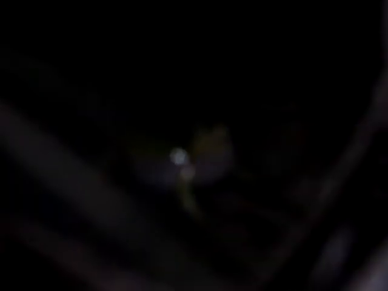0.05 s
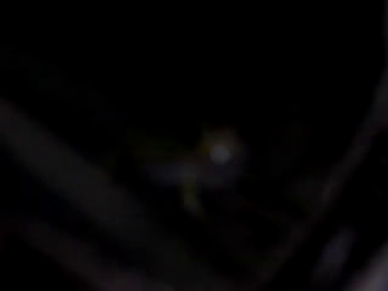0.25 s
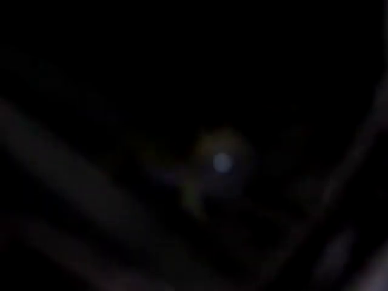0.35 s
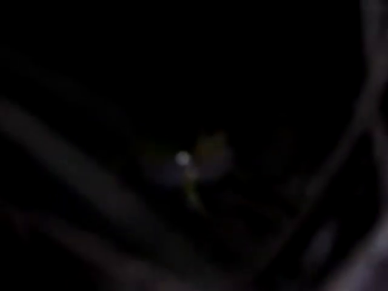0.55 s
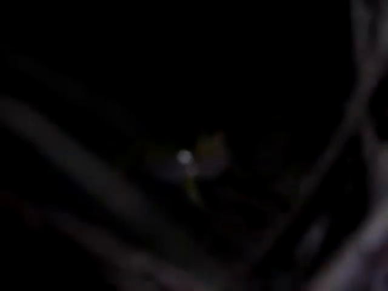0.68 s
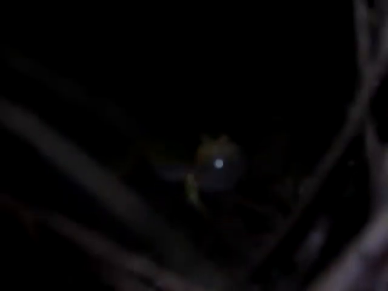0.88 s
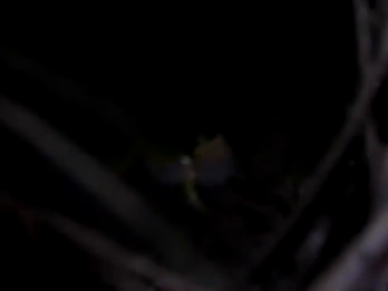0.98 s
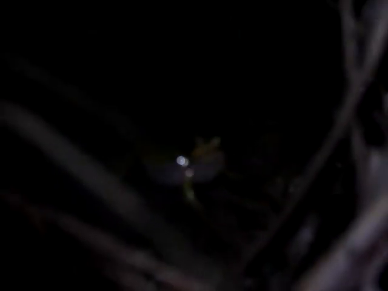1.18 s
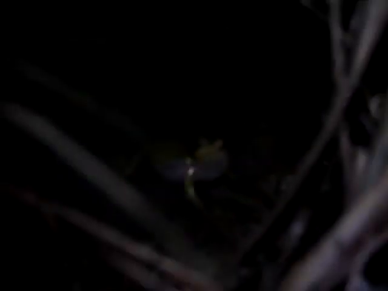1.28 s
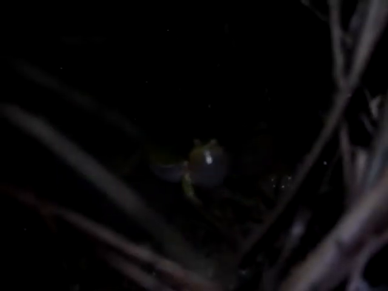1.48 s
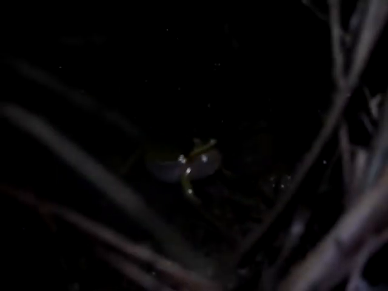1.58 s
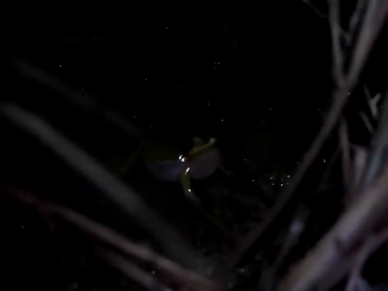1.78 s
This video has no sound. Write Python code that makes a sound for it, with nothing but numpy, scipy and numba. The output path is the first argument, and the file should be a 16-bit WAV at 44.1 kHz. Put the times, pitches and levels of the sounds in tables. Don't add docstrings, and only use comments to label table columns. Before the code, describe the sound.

A small tree frog croaks close by at 0.22, 0.77 and 1.29 seconds, each a harsh, nasal rattle of about nineteen rapid double pulses lasting 0.16 seconds, brightening as it swells; a fourth just begins at 1.84. Underneath, steady high crickets and rasping katydids, low hiss, faint far frogs between croaks, and soft camera knocks, notably near 1.15. The background dips during croaks. Outdoors, night, little echo.

```python
import sys
import numpy as np
from scipy import signal
from scipy.io import wavfile
from scipy.ndimage import uniform_filter1d
from numba import njit

SR = 44100
rng = np.random.default_rng(int(sys.argv[2]) if len(sys.argv) > 2 else 0)


def invert_db(level):
    return 10 ** (np.asarray(level, dtype=float) / 20)


def inscribe(sig):
    pcm = np.round(np.clip(np.atleast_2d(sig).T, -1, 1) * 32767)
    wavfile.write(sys.argv[1], SR, pcm.astype(np.int16))


N = 81585
TIME = np.arange(N) / SR


@njit
def moving_bandpass(x, hz, width):
    y, band_state, low_state = np.empty(len(x)), 0., 0.
    for i in range(len(x)):
        g, damping = np.tan(np.pi * hz[i] / SR), width / hz[i]
        v = (band_state + g * (x[i] + 1e-18 - low_state)) / (1 + g * (g + damping))
        band_state = 2 * v - band_state
        low_state += 2 * g * v
        y[i] = damping * v
    return y


def resonate(x, hz, width, widening=1):
    hz = hz + np.zeros(N)
    return moving_bandpass(moving_bandpass(x, hz, float(width)), hz, float(widening * width))


def set_level(x, db):
    return x * invert_db(db) / np.sqrt(np.mean(x ** 2))


def walk(rate):
    hold = int(SR / rate)
    steps = np.repeat(rng.standard_normal(N // hold + 1), hold)[:N]
    return 0.93 * uniform_filter1d(uniform_filter1d(steps, hold), hold)


def clicks(times, sizes):
    at = np.asarray(times)[:, None] * SR
    idx = np.floor(at).astype(int) + np.arange(-8, 9)
    shape = np.sinc(idx - at) * np.cos(np.pi * (idx - at) / 18) ** 2
    out = np.zeros(N + SR)
    np.add.at(out, idx, np.asarray(sizes)[:, None] * shape)
    return out[:N]


def window(centre, length, edge):
    return np.clip((length / 2 - np.abs(TIME - centre)) / edge + .5, 0, 1)


# f/Hz, level/dB (per Hz)
NIGHT_COLOUR = [(30, 10), (60, -15), (150, -15.5), (500, -13), (2000, -13), (3500, -12), (4400, -18),
                (10000, -18.5)]


def night():
    out, rows = 0, np.array(NIGHT_COLOUR)
    for hz in 30 * 2 ** np.arange(0, 8.5, 1 / 3):
        db = np.interp(np.log(hz), np.log(rows[:, 0]), rows[:, 1]) + walk(5)
        out = out + invert_db(db) * resonate(rng.standard_normal(N), hz, hz / 3)
    return set_level(out, -55)


# f/Hz, width/Hz, trill rate/Hz, trill depth (0-1), flicker/dB, level/dB
INSECT_VOICES = [
    (3750, 260, 13, 0, -10.5, -49),
    (6394, 393, 50, 0.3, .8, -52.5),
    (3083, 360, 57, 0.5, 4, -52.5),
]


def insects():
    out = 0
    for hz, width, rate, depth, flicker_db, db in INSECT_VOICES:
        phase = np.cumsum(rate * (1 + 0.035 * walk(5.34))) / SR
        throb = 1 + depth * np.sin(2 * np.pi * phase)
        rasp = resonate(rng.standard_normal(N), hz, width, 1.77)
        flicker = invert_db(min(flicker_db, 1.2) * walk(30))
        out = out + set_level(rasp * throb * flicker, db)
    return out


CRICKET_HZ, CRICKET_FALL_HZ, CRICKET_PER_S, CRICKET_DB = 3804, 69, 39.6, -50.5


def cricket():
    beat = np.cumsum(CRICKET_PER_S * (1 + 0.011 * walk(4.4))) / SR % 1
    hz = CRICKET_HZ + CRICKET_FALL_HZ * (1 - 2 * beat) + 12 * walk(25)
    pulses = np.sin(np.pi * beat) ** 4.5 * invert_db(1.3 * walk(60))
    return set_level(pulses * np.sin(2 * np.pi * np.cumsum(hz) / SR), CRICKET_DB)


# t/s, level/dB
CAMERA_KNOCKS = [(.045, -84), (0.439, -72.5), (0.629, -77), (.19, -72.5), (1.148, -68), (1.18, -75.5),
                 (1.244, -78.5)]
# f/Hz, width/Hz, level/dB
CAMERA_BODY = [
    (356, 23, 1),
    (565, 114, 14),
    (880, 120, 14),
]


def knocks():
    rows = np.array(CAMERA_KNOCKS)
    hit = uniform_filter1d(clicks(rows[:, 0], invert_db(rows[:, 1])), 12)
    return sum(invert_db(db) * resonate(hit, hz, width) * SR / width for hz, width, db in CAMERA_BODY)


# centre t/s, length/s, pulse rate/Hz, level/dB
FAR_CALLS = [
    (0.174, 0.11, 120, -58),
    (0.689, 0.23, 118, -62.5),
    (1.051, 0.31, 122, -62),
    (1.47, 0.099, 120, -60),
    (1.678, 0.2, 85, -62),
]
# f/Hz, width/Hz, level/dB
FAR_RESONANCES = [
    (1420, 900, 6.2),
    (2390, 67, -5.5),
    (2653, 600, 8),
    (3270, 170, 6),
]


def far_frogs():
    gate = 0
    for centre, length, rate, db in FAR_CALLS:
        pulses = np.exp(-(TIME * rate % 1) / 1.05)
        gate = gate + invert_db(db) * window(centre, length, 0.091) * pulses
    calls = gate * rng.standard_normal(N)
    return sum(invert_db(db) * resonate(calls, hz, width) * np.sqrt(SR / width) for hz, width, db in FAR_RESONANCES)


FULL_PULSES = 19
PERIOD_MS, SPEEDUP_MS, PULSE_JITTER_MS = 8.4, .045, .13
START_DRAG_MS, START_DRAG_PULSES, END_DRAG_MS, END_DRAG_PULSES = 3.0, .9, .9, .8
RISE_DB, RISE_PULSES, FALL_DB, FALL_PULSES = -22, 1.2, -12, 1.5
SLAP_GAP_MS, EDGE_GAP_MS, SLAP_JITTER_MS, SLIP_MS = 2.6, .9, .03, .025
SECOND_DB, EDGE_SECOND_DB, SCATTER_DB, SIGH_MS = 1.5, 7, .5, 8.5
SNAP_LOSS, SNAP_FADE_DB = 5.0, -48
RASP_MS, RASP_DB, RASP_LOSS = 5.7, 10.5, 0.63
# t/s, level/dB (loss)
FEEBLE_SLAPS = [(.258, -11.5), (.266, -12), (.2745, -6), (.299, -13), (.3145, -4.5), (.322, -10.5),
                (.338, -11.5), (.354, -7), (.797, -8.5), (.830, -10), (.846, -17.5), (.862, -10),
                (.878, -8.5), (.886, -5), (.893, -3.5), (1.379, -11.5), (1.395, -7.5), (1.418, -14.5)]


def slaps(start, stretch, db, sigh_db, count):
    k = np.arange(count)
    left = max(count, FULL_PULSES) - 1 - k
    early, late = np.exp(-k / START_DRAG_PULSES), np.exp(-left / END_DRAG_PULSES)
    swell, fade = np.exp(-k / RISE_PULSES), np.exp(-left / FALL_PULSES)
    gap_chance, second_chance, first_chance, time_chance = rng.standard_normal((4, count))

    period_ms = PERIOD_MS - SPEEDUP_MS * k + START_DRAG_MS * early
    period_ms = period_ms + END_DRAG_MS * np.exp(-(left - 1) / END_DRAG_PULSES)
    onset = start + stretch * (np.cumsum(period_ms) - period_ms) / 1000
    onset = onset + PULSE_JITTER_MS * time_chance / 1000
    feeble = np.array(FEEBLE_SLAPS)
    loss_db = (np.abs(onset[:, None] - feeble[:, 0]) < .004) @ feeble[:, 1]

    size_db = db + RISE_DB * swell + FALL_DB * fade
    gap_ms = SLAP_GAP_MS + EDGE_GAP_MS * (early + late) + SLAP_JITTER_MS * gap_chance + SLIP_MS * loss_db
    second_s = onset + gap_ms / 1000
    second_db = size_db + SECOND_DB + EDGE_SECOND_DB * (swell + late) + SCATTER_DB * second_chance
    first_s = np.append(onset, onset[-1] + SIGH_MS / 1000)
    first_db = np.append(size_db + SCATTER_DB * first_chance, db + sigh_db)

    first = clicks(first_s, invert_db(first_db))
    second = clicks(second_s, invert_db(second_db + loss_db))
    snap = clicks(second_s, invert_db(second_db + SNAP_LOSS * loss_db + SNAP_FADE_DB * late))
    span = int(RASP_MS * SR / 1000)
    air = clicks(onset, invert_db(size_db + RASP_DB + RASP_LOSS * loss_db))
    puff = np.convolve(air, np.hanning(span) / np.sqrt(span))[:N] * rng.standard_normal(N)
    return first, second, snap, puff


INFLATE_S, BREATHY_DB, THROAT_TOP_HZ = 0.032, -30, 3700
TIGHTEN = 0.016
# f/Hz at start, f/Hz once inflated, width/Hz, level/dB at start, level/dB at end
THROAT_AND_SAC = [
    (1200, 1274, 223, -0.5, -11),
    (2110, 2350, 432, 5, -2),
    (2583, 2950, 327, 3.5, 3.1),
    (1790, 1865, 400, -24, -6),
    (3450, 3710, 660, -9.5, -17.5),
]
SECOND_SLAP_SHARE = [-6, -13, 1.96, 4, 4]


def throat(first, second, fill, spent):
    breath = invert_db(BREATHY_DB) * rng.standard_normal(N) * uniform_filter1d(np.abs(first + second), 90) * 20
    out = 0
    for (hz0, hz1, width, db0, db1), share_db in zip(THROAT_AND_SAC, SECOND_SLAP_SHARE):
        hz = (hz0 + (hz1 - hz0) * fill) * (1 + TIGHTEN * spent)
        drive = first + invert_db(share_db) * second + breath
        gain = invert_db(db0 + (db1 - db0) * spent)
        out = out - gain * resonate(drive, hz, width, 2.4) * SR / width / 3
    return signal.sosfilt(signal.butter(4, [930, THROAT_TOP_HZ], "band", fs=SR, output="sos"), out)


# f/Hz, width/Hz, level/dB at start, level/dB at end
SNAP_RESONANCES = [
    (60, 170, -27, -24.5),
    (324, 860, -17.5, -21),
    (602, 680, -25.5, -48),
    (4574, 2050, -3, -14.5),
    (5654, 1020, -4.5, -43.5),
    (8650, 980, -39, -24),
]


def slap_snap(snap, puff, fill, spent):
    out = 0
    for hz, width, db0, db1 in SNAP_RESONANCES:
        drive = fill * snap + (hz > THROAT_TOP_HZ) * puff
        out = out + invert_db(db0 + (db1 - db0) * spent) * resonate(drive, hz, width) * SR / width / 3
    return out


def croak(start, stretch, db, sigh_db, count):
    first, second, snap, puff = slaps(start, stretch, db, sigh_db, count)
    fill = 1 - np.exp(-np.clip(TIME - start, 0, None) / INFLATE_S)
    spent = np.clip((TIME - start) / (max(count, FULL_PULSES) * PERIOD_MS / 1000), 0, 1)
    return throat(first, second, fill, spent) + slap_snap(snap, puff, fill, spent)


# first pulse t/s, tempo stretch (factor), level/dB, closing sigh level/dB
CROAK_CALLS = [
    (.2205, 1.004, -11.5, -15),
    (.768, 1.0, -11.5, -19),
    (1.2927, 0.9995, -11.5, -40),
    (1.8448, 1.0, -12, -20),
]
CROAK_PULSES = (19, 20, 19, 1)
ECHO_DB, ECHO_S = -20, .005


def frog():
    direct = sum(croak(*row, count=count) for row, count in zip(CROAK_CALLS, CROAK_PULSES))
    tail = rng.standard_normal(2000) * np.exp(-np.arange(2000) / SR / ECHO_S)
    return direct + invert_db(ECHO_DB) * signal.fftconvolve(direct, tail / 10)[:N]


SAG_DB, RECOVER_S, MASK_DB, MASK_EDGE_S = -3, 0.72, -6, .01


def scene():
    sag_db = 0
    for row, count in zip(CROAK_CALLS, CROAK_PULSES):
        start, end = row[0], row[0] + count * PERIOD_MS / 1000
        recovery = np.exp(-np.clip(TIME - end, 0, None) / RECOVER_S)
        mask = window((start + end) / 2, end - start, MASK_EDGE_S)
        sag_db = sag_db + (TIME > start) * SAG_DB * recovery + MASK_DB * mask
    background = night() + insects() + cricket() + knocks() + far_frogs()
    return (frog() + invert_db(sag_db) * background)[None]


def low_pass(x):
    return signal.sosfilt(signal.butter(12, 10210, fs=SR, output="sos"), x)


BEND, LOW_CUT_HZ, TOP_HZ = 0.0065, 17, 10050
# centre t/s, length/s, low f/Hz, high f/Hz
BAND_GAPS = [(.204, 0.0065, 395, 9000), (0.211, 0.026, 4400, 6360), (0.215, 0.0053, 2300, 3200),
             (0.384, 0.021, 1650, 2400), (0.762, 0.025, 1650, 2630), (0.947, 0.022, 1200, 5560),
             (1.284, 0.0067, 660, 7400), (1.29, 0.014, 4800, 7700), (1.455, 0.012, 600, 9400),
             (1.822, 0.04, 1200, 3400)]
# low f/Hz, high f/Hz
FEEBLE_GAP = (5600, 7600)


def record(dry):
    x = dry[0] - BEND * dry[0] ** 2
    x = signal.sosfilt(signal.butter(1, LOW_CUT_HZ, "high", fs=SR, output="sos"), x)
    feeble_gaps = [(s + .003, 0.004, *FEEBLE_GAP) for s, db in FEEBLE_SLAPS if db < -7.5 and s > .29]
    for centre, length, low_hz, high_hz in list(BAND_GAPS) + feeble_gaps:
        sos = signal.butter(5, [low_hz, high_hz], "band", fs=SR, output="sos")
        x = x - window(centre, length, .006) * signal.sosfiltfilt(sos, x)
    x = signal.sosfilt(signal.ellip(10, .2, 80, TOP_HZ, fs=SR, output="sos"), x)
    return low_pass(x[None])


dry = scene()
out = record(dry)
inscribe(out)
```